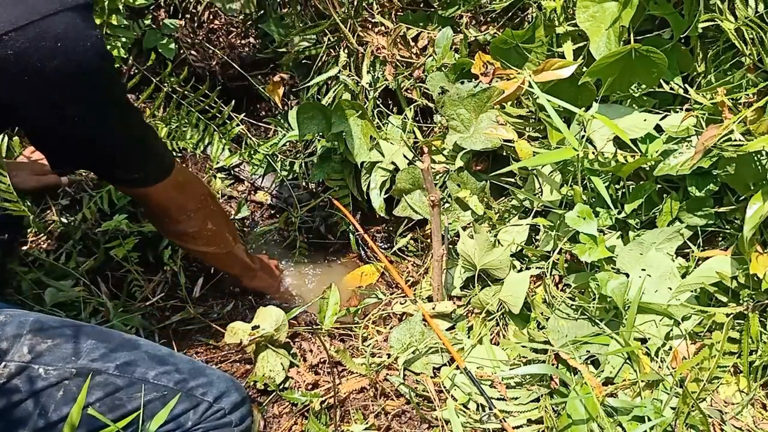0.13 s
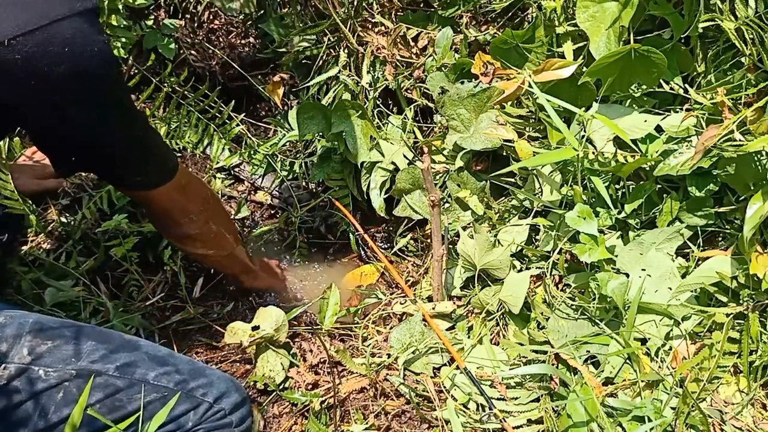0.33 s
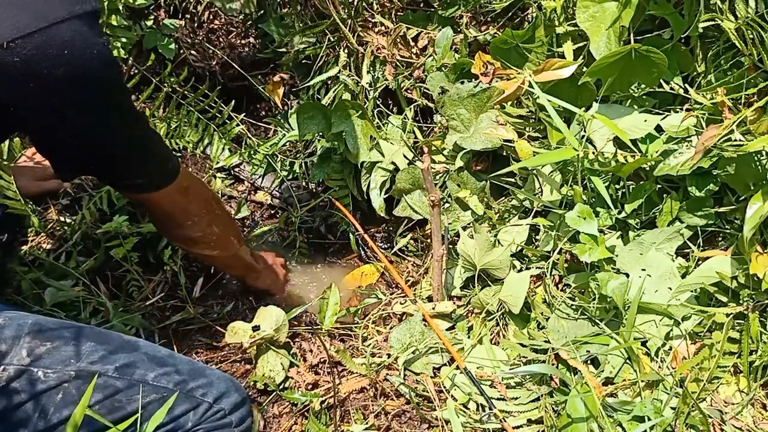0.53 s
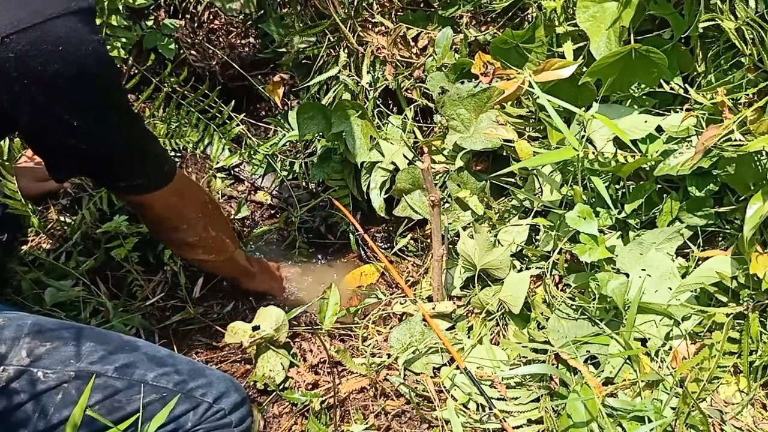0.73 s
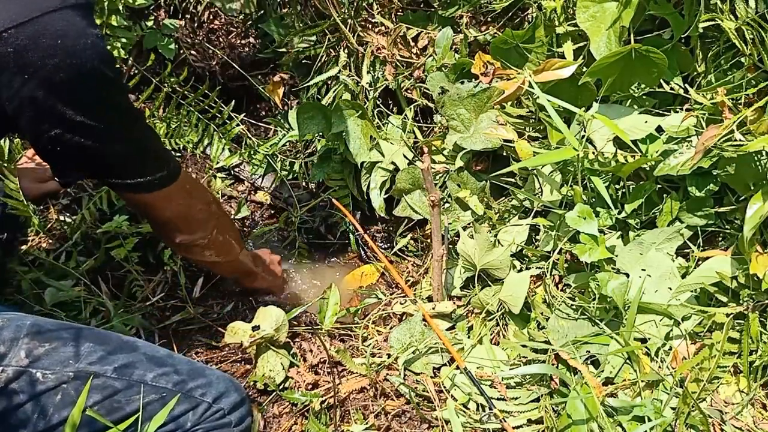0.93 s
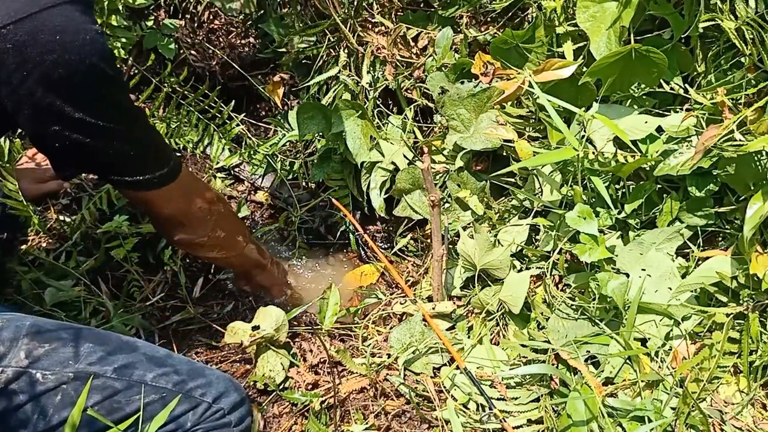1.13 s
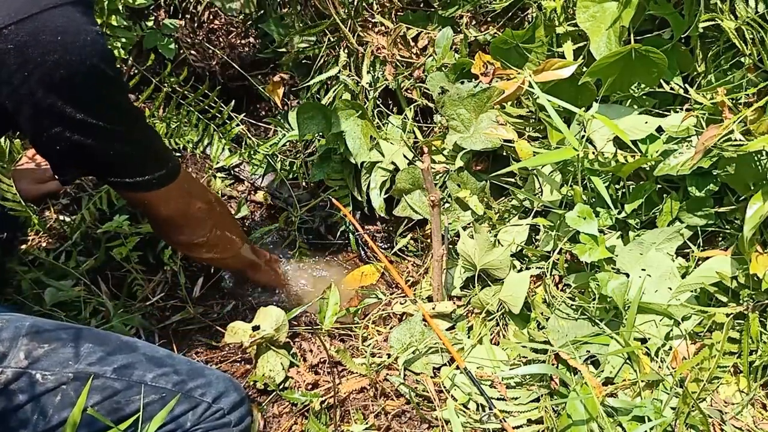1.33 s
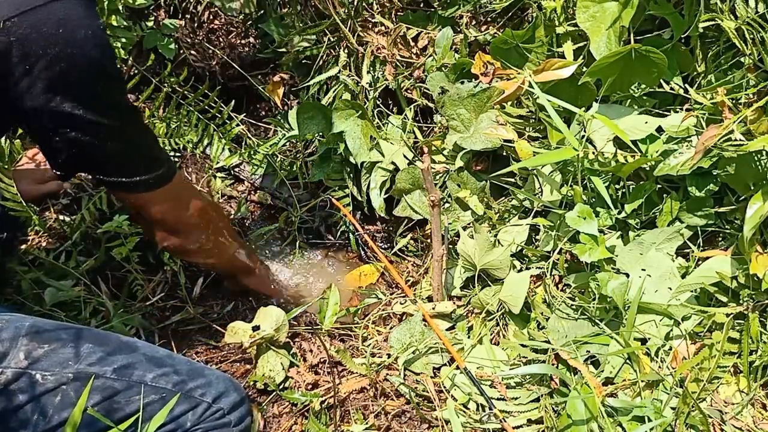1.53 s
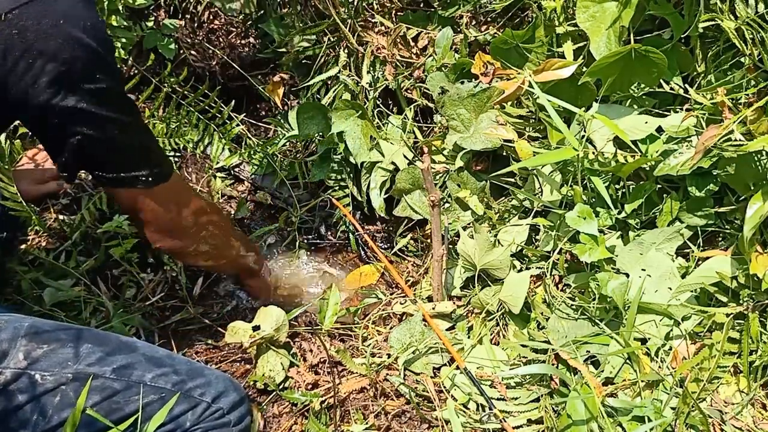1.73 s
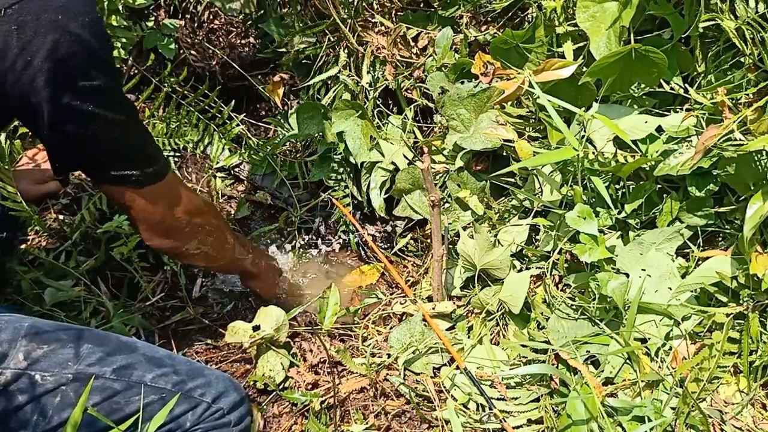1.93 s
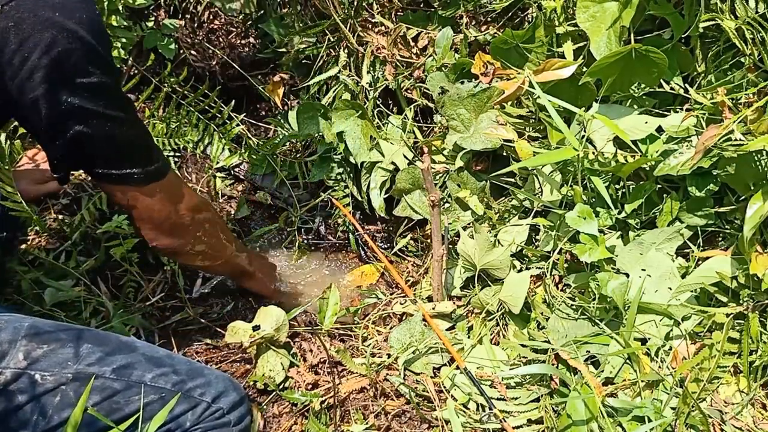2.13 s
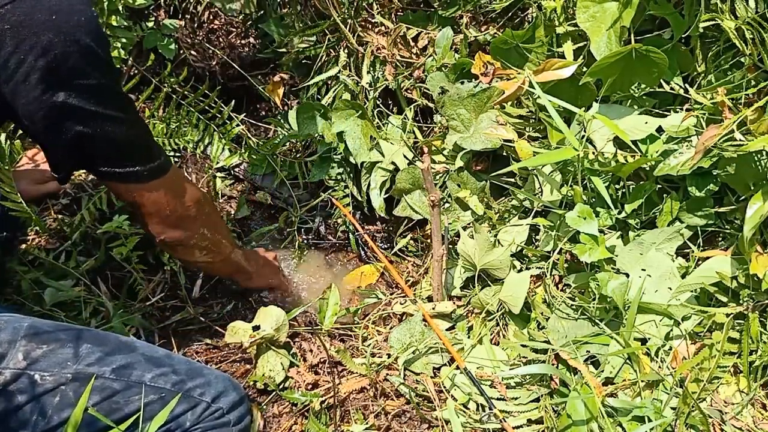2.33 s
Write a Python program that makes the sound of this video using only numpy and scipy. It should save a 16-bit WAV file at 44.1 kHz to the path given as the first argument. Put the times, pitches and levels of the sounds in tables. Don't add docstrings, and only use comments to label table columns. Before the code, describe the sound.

A hand hits muddy water in a small hole, close to the microphone: sharp hollow slaps at about 0.2, 0.64 and 1.1 seconds, the last a quick double, each with popping bubbles and brief spray. After a short lull with small drips, a softer, uneven, bubbly slosh runs from 1.5 to 2.2 seconds, then fades. Low wind buffets and faint insect and leaf hiss lie underneath.

```python
import sys
import numpy as np
from scipy import signal
from scipy.fft import rfft, irfft
from scipy.io import wavfile

SR = 44100
rng = np.random.default_rng(int(sys.argv[2]) if len(sys.argv) > 2 else 0)


def generate_wav(sig):
    pcm = np.round(np.clip(np.atleast_2d(sig).T, -1, 1) * 32767).astype(np.int16)
    wavfile.write(sys.argv[1], SR, pcm)


def makeup_ratio(level_db):
    decades = np.asarray(level_db, float) / 20
    return 10 ** decades


N = 105840
TIME = np.arange(N) / SR


def lin_log(points, hz):
    f, db = np.transpose(points)
    return np.interp(np.log(np.maximum(hz, 1)), np.log(f), db, left=-90, right=-90)


def unit(x):
    return x / np.sqrt(np.mean(x ** 2) + 1e-20)


def coloured(points, channels):
    hz = np.arange(N // 2 + 1) * SR / N
    white = rfft(rng.standard_normal((channels, N)))
    return unit(irfft(white * makeup_ratio(lin_log(points, hz)), N))


def drift(rate_hz):
    r = np.exp(-2 * np.pi * rate_hz / SR)
    settled = signal.lfilter([1], [1, -2 * r, r * r], rng.standard_normal(N + SR))[SR:]
    return unit(settled)


def envelope(start_s, attack_s, hold_s, t60_s):
    t = TIME - start_s
    return np.clip(t / attack_s, 0, 1) * makeup_ratio(-60 * np.clip(t - hold_s, 0, None) / t60_s)


def bubbles(start_s, gain, pitch_hz, t60_s, attack_s, rise):
    out = np.zeros(N + SR)
    for start, g, f, d in zip(start_s, gain, pitch_hz, t60_s):
        i = int(start * SR)
        t = np.arange(int(d * SR) + 2) / SR - (start - i / SR)
        t = np.maximum(t, 0)
        swell = (1 - np.exp(-t / attack_s)) * makeup_ratio(-60 * t / d)
        out[i:i + len(t)] += g * swell * np.sin(2 * np.pi * f * t * (1 + rise * t / d))
    return out[:N]


def late(x, lag_s):
    hz = np.arange(N // 2 + 1) * SR / N
    return irfft(rfft(x) * np.exp(-2j * np.pi * hz * lag_s), N)


def high_pass(x, cut_hz):
    return signal.sosfilt(signal.butter(4, cut_hz, "high", fs=SR, output="sos"), x)


def field():
    # pitch_hz, level_db [dB per Hz]
    hiss_colour = [(150, -4), (1500, -4), (2500, -2), (4800, -7.5), (6600, -3), (8100, -6.5), (8600, -20.5),
                   (15500, -34.5)]
    shared, left, right = coloured(hiss_colour, channels=3)
    alike = 0.061
    hiss = np.sqrt(alike) * shared + np.sqrt(1 - alike) * np.array([left, right])
    return makeup_ratio(-53 + 0.5 * drift(24)) * hiss


def wind():
    # pitch_hz, level_db [dB per Hz]
    rumble_colour = [(15, -68), (25, -11), (59, -7.5), (97, -1.5), (221, -17), (251, -35), (400, -20),
                     (520, -77), (880, -120)]
    # start_s, level_db [peak], pitch_hz, lean_db [left minus right]
    buffets = [(0.002, -33.5, 69, 20), (0.061, -38.5, 90, -1), (0.193, -26, 75.4, 35),
               (0.268, -58, 77.4, 13.0), (0.423, -31, 87, -45), (0.569, -35, 77.8, -27),
               (0.749, -32.5, 92, -39), (0.797, -49, 75, -21), (0.875, -30.5, 91, -40),
               (0.937, -24.5, 128.4, -42), (0.976, -19.5, 148, -41), (1.051, -39, 99, 5),
               (1.102, -20.5, 212, 3), (1.301, -43.5, 82.5, -44), (1.52, -38.5, 112, -41),
               (1.595, -31.5, 84.5, 19), (1.655, -25.5, 147, 25), (1.69, -14.5, 89, 33),
               (1.719, -20.5, 84, 13), (1.779, -12.5, 153, 28), (1.805, -12, 145, 28),
               (1.831, -22, 113, 27), (1.938, -31, 54, 11), (2.041, -36, 70.4, 19), (2.238, -43, 115, -10),
               (2.284, -31.5, 106, -18)]
    steady_db, gust_db = -57, -21
    out = coloured(rumble_colour, channels=2)
    start_s, level_db, pitch_hz, lean_db = np.transpose(buffets)
    for port, side in enumerate((1, -1)):
        gain = makeup_ratio(level_db + 7 + np.minimum(side * lean_db, 0))
        gusts = sum(g * envelope(s, attack_s=0.025, hold_s=0.013, t60_s=0.13) for s, g in zip(start_s, gain))
        lumps = makeup_ratio(2.5 * drift(41))
        out[port] *= (makeup_ratio(steady_db) + makeup_ratio(gust_db) * gusts) * lumps
        out[port] += bubbles(start_s, gain * makeup_ratio(5.5), pitch_hz, 3.33 / pitch_hz, attack_s=0.0035, rise=0)
    return high_pass(out, 52.7)


def spray():
    # pitch_hz, level_db [dB per Hz]
    droplet_colour = [(1900, 10.5), (2600, 2.5), (3800, 0.5), (4600, -8), (6700, 0.5), (8100, -12),
                      (8600, -22), (15500, -35)]
    grain_db, own_share = 3.0, 0.75
    shared, left, right = coloured(droplet_colour, channels=3) * makeup_ratio(grain_db * drift(234))
    return shared, own_share * np.array([left, right])


def slosh():
    # start_s, level_db [rms], length_s, bright_db [spray above gurgle]
    surges = [(0.226, -41, 0.036, -14.5), (0.342, -43, 0.003, 7.5), (0.364, -59, 0.03, 5),
              (0.519, -70.5, 0.0096, 23.5), (0.59, -36.5, 0.025, -36), (0.652, -36.5, 0.0095, -4.5),
              (0.837, -53.5, 0.012, 3), (1.091, -28.5, 0.011, 2), (1.124, -33.5, 0.037, -7),
              (1.177, -34.5, 0.047, -7), (1.231, -48, 0.061, -23), (1.458, -54.5, 0.18, 4),
              (1.552, -34.5, 0.047, 0), (1.602, -35.5, 0.024, 2), (1.64, -37.5, 0.028, -11),
              (1.659, -40, 0.019, 11.5), (1.692, -41, 0.041, -7.5), (1.738, -29, 0.041, -2.5),
              (1.792, -37.5, 0.037, 1.5), (1.819, -32.5, 0.035, 4.5), (1.852, -35.5, 0.062, -6.5),
              (1.912, -33, 0.038, 1.5), (1.953, -34.5, 0.059, -4.5), (1.998, -29.5, 0.0084, 6),
              (2.023, -35, 0.018, -20), (2.069, -30, 0.032, 1), (2.1, -35, 0.037, -10),
              (2.135, -32, 0.019, 4.5), (2.154, -45, 0.06, -3.5), (2.234, -54, 0.058, 3.5),
              (2.359, -66.5, 0.0049, 32.5)]
    flow_power, mist_power = 0, 0
    for start_s, level_db, length_s, bright_db in surges:
        shape = envelope(start_s, attack_s=0.011, hold_s=length_s, t60_s=0.11)
        flow_power = flow_power + (makeup_ratio(level_db) * shape) ** 2
        mist_power = mist_power + (makeup_ratio(level_db + bright_db - 8) * shape) ** 2

    count, centre_hz, spread_oct, ring_cycles = 2100, 1350, 0.666, 18.8
    uneven_db, tilt_db = 5.5, 3.5
    when, size, sign = rng.random((3, count))
    hz = np.clip(centre_hz * 2 ** (spread_oct * rng.standard_normal(count)), 420, 7000)
    gain_db = -uneven_db * np.log(size * 0.49 + 0.0794) + tilt_db * np.log2(hz / centre_hz)
    gain = makeup_ratio(gain_db) * np.sign(sign - .5)
    swarm = bubbles(when * N / SR, gain, hz, ring_cycles / hz, attack_s=0.00012, rise=0.115)
    return makeup_ratio(-1) * np.sqrt(flow_power) * unit(swarm), np.sqrt(mist_power)


def plops():
    # start_s, level_db [peak], pitch_hz, t60_s
    lone_bubbles = [(.128, -41, 1607, 0.076), (.13, -50.5, 673, 0.12), (0.196, -34, 1350, 0.03),
                    (0.205, -25.5, 1350, 0.039), (0.642, -15, 1270, 0.014), (.599, -17, 1150, 0.035),
                    (.218, -15, 582, 0.048), (.243, -33.5, 269, 0.064), (.3497, -28, 3170, .008),
                    (.35, -31.5, 1533, .016), (.6, -28, 537, 0.048), (.643, -17.5, 287, 0.052),
                    (.672, -25.5, 1620, 0.017), (0.756, -45, 1570, 0.032), (.826, -47, 842, 0.075),
                    (1.089, -12, 2000, .012), (1.100, -14.5, 706, 0.011), (1.221, -19, 1560, .009),
                    (1.161, -18.5, 261, 0.035), (1.19, -24, 1720, 0.017), (1.197, -25, 1724, 0.027),
                    (1.220, -31.5, 475, 0.07), (1.534, -14.5, 1250, 0.021), (1.571, -26.5, 730, 0.064),
                    (1.594, -28.5, 750, 0.057), (1.603, -19, 1370, 0.026), (1.646, -17.5, 2110, 0.013),
                    (1.794, -24, 1316, 0.077), (1.855, -15, 1112, 0.036), (1.676, -32, 2140, .02),
                    (1.993, -14, 1680, 0.013), (2.106, -35.5, 343, 0.12), (2.18, -42, 316, 0.063),
                    (2.21, -30, 1243, 0.028), (2.271, -37.5, 1250, 0.043), (2.340, -43, 1350, 0.026)]
    start_s, level_db, pitch_hz, t60_s = np.transpose(lone_bubbles)
    ring = bubbles(start_s, makeup_ratio(level_db + 1.5), pitch_hz, t60_s, attack_s=0.00071, rise=0.15)
    return ring * makeup_ratio(5 * np.tanh(drift(130)))


def pockets():
    # start_s, level_db [peak], pitch_hz, t60_s
    slap_pockets = [(0.213, -26, 2230, 0.01), (0.216, -9, 1650, 0.0062), (0.215, 1, 1218, 0.0097),
                    (0.216, 0, 1720, 0.017), (0.216, -11, 3136, 0.013), (0.218, 2, 1330, 0.011),
                    (0.221, -9, 1770, 0.0066), (0.224, -9.5, 1180, 0.023), (0.637, -20, 1330, 0.032),
                    (0.636, -11.5, 544, 0.041), (0.637, -1.5, 2006, 0.012), (0.637, -8.5, 1220, 0.022),
                    (0.637, -5.5, 2740, 0.0082), (0.639, -7.5, 2560, 0.0083), (0.651, -5.5, 1154, 0.015),
                    (1.093, 4.5, 1520, 0.0057), (1.093, -8, 734, 0.016), (1.094, -1, 1920, 0.007),
                    (1.096, -6.5, 1880, 0.0094), (1.117, 1.5, 1850, 0.0061), (1.12, -11, 2610, 0.016),
                    (1.119, 0, 1040, 0.018), (1.12, -7.5, 503, 0.017), (1.12, -8, 1426, 0.018),
                    (1.121, -4, 815, 0.017), (1.121, -2, 2070, 0.0095), (1.122, -9.5, 2800, 0.0051),
                    (1.123, -12, 755, 0.036), (1.125, 2.5, 1700, 0.0055), (1.128, -14, 520, 0.054),
                    (1.769, -11.5, 1450, 0.021), (1.77, -2.5, 2270, 0.0081), (1.771, -8.5, 2770, 0.0075)]
    # start_s, level_db [peak], pitch_hz, t60_s
    slosh_bubbles = [(1.741, -18.5, 940, 0.014), (1.75, -16, 680, 0.007), (1.753, -23, 1690, 0.038),
                     (1.789, -24, 1620, 0.03), (1.825, -23, 1540, 0.022), (1.842, -15, 930, 0.025),
                     (1.846, -7, 1210, 0.0049), (1.849, -13.5, 580, 0.0076), (1.875, -19, 1460, 0.013),
                     (1.932, -24, 2300, 0.0096), (1.931, -9, 1050, 0.0046), (1.936, -20.5, 840, 0.021),
                     (1.996, -19.5, 1440, 0.015), (2.006, -21.5, 2200, 0.013), (2.012, -20.5, 2540, 0.016),
                     (2.066, -23, 1340, 0.023), (2.068, -11.5, 1100, 0.011), (2.075, -22, 1060, 0.025),
                     (2.085, -17, 1690, 0.0087), (2.088, -31, 1810, 0.017), (2.094, -23.5, 1016, 0.035),
                     (2.121, -7, 1060, 0.0073), (2.123, -13.5, 1710, 0.008), (2.156, -25.5, 2300, 0.019)]
    start_s, level_db, pitch_hz, t60_s = np.transpose(slap_pockets + slosh_bubbles)
    return bubbles(start_s, makeup_ratio(level_db + 1.0), pitch_hz, t60_s, attack_s=0.00066, rise=0.088)


def slaps():
    # start_s, level_db [peak],
    # length_s [contact], pitch_hz [pockets]
    contacts = [(0.212, 3.5, 0.0069, 1534), (0.218, -19.5, 0.019, 1200), (0.5983, -15, 0.0051, 2100),
                (0.022, -44, 0.038, 610), (0.286, -42, 0.028, 633), (0.579, -38, 0.024, 556),
                (0.634, 3, 0.0058, 1050), (0.647, -9, 0.0036, 1180), (1.089, -4, 0.0038, 1860),
                (1.091, -6.5, 0.008, 1654), (1.115, -4, 0.0041, 2005), (1.119, -9, 0.0043, 1510),
                (1.123, -9, 0.00844, 890), (1.7677, -21.5, 0.0028, 2220), (1.768, -12, 0.00328, 1600),
                (1.834, -16.5, 0.0057, 1065), (1.676, -34.5, 0.0119, 600), (2.065, -18.5, 0.0065, 1220),
                (2.1227, -21, 0.0022, 1180)]
    per_contact, ring_cycles = 10, 14.2
    spread_oct, fall_oct = 0.15, 0.13
    rows = np.repeat(contacts, per_contact, axis=0)
    chance = rng.random((2, len(rows)))
    spread = rng.standard_normal((2, len(rows)))
    start_s, level_db, length_s, pitch_hz = rows.T
    when = (np.arange(len(rows)) % per_contact + chance[0]) / per_contact
    hz = pitch_hz * 2 ** (spread_oct * spread[0] - fall_oct * (when - .5))
    gain_db = level_db - 2.5 - 2.7 * (1 - when) ** 3 + 0.51 * spread[1]
    gain_db = gain_db - 12.5 * (length_s < 0.01)
    gain = makeup_ratio(gain_db) * np.sign(chance[1] - .5)
    ring = bubbles(start_s + length_s * when, gain, hz, ring_cycles / hz, attack_s=0.00016, rise=0.17)

    burst = np.zeros(N)
    for start_s, level_db, length_s, _ in contacts:
        crack = makeup_ratio(-21) * envelope(start_s, attack_s=0.0024, hold_s=length_s, t60_s=0.025)
        tail = makeup_ratio(-37) * envelope(start_s, attack_s=0.0093, hold_s=length_s, t60_s=0.1)
        burst += makeup_ratio(level_db) * (crack + tail)
    return ring, burst


def scene():
    air = wind() + field()
    shared, own = spray()
    gurgle, mist = slosh()
    ring, burst = slaps()
    mist = mist * makeup_ratio(3 * drift(29))
    fine = mist * makeup_ratio(5.5) * high_pass(own, 10000)
    water = high_pass(ring + plops() + pockets() + gurgle, 215) + (burst + mist) * shared
    ports = np.array([late(water, 0.0001), water])
    banks = makeup_ratio(-15) * np.array([late(water, lag_s) for lag_s in (0.0028, 0.0031)])
    return ports + banks + (burst + mist) * own + fine + air


def top_cut(x):
    return signal.sosfilt(signal.butter(12, 15810, fs=SR, output="sos"), x)


def record(dry):
    limited = np.clip(dry, -1, 1)
    return top_cut(limited)


dry = scene()
out = record(dry)
generate_wav(out)
```